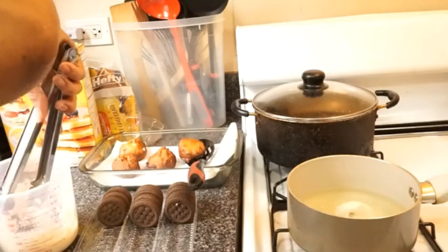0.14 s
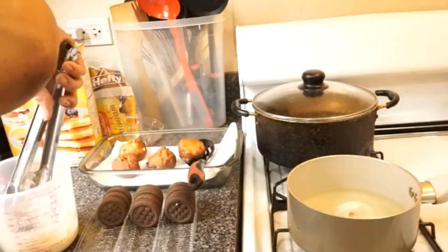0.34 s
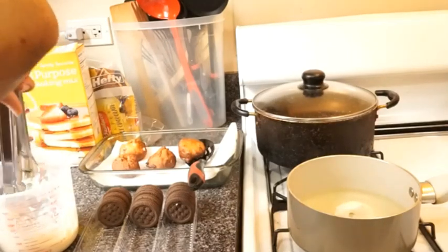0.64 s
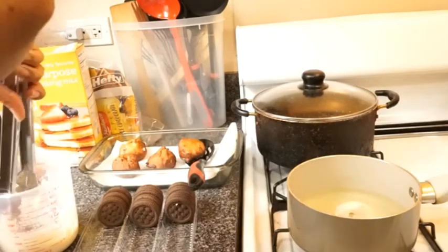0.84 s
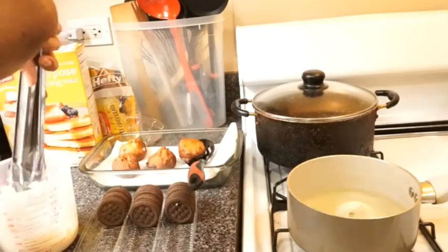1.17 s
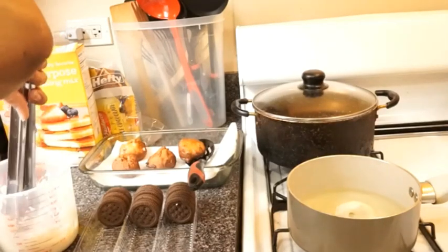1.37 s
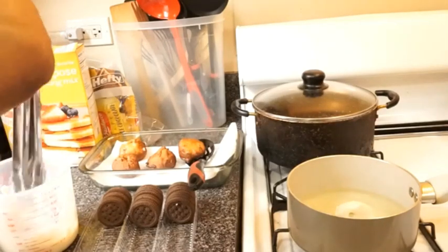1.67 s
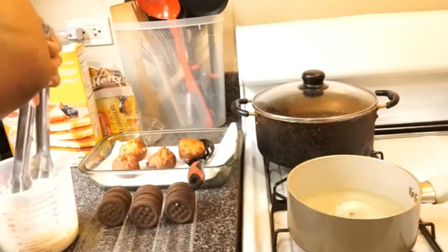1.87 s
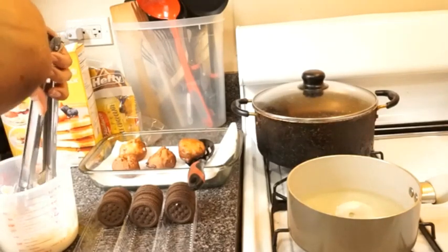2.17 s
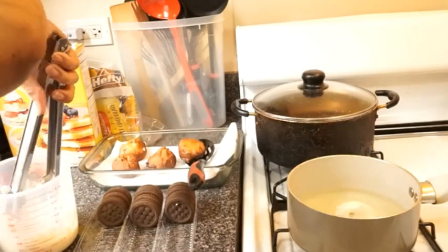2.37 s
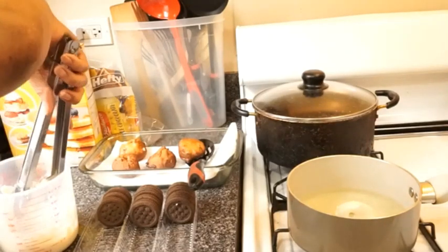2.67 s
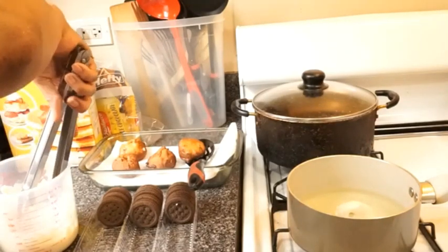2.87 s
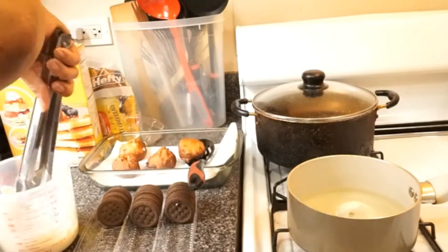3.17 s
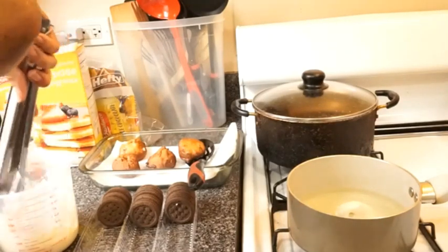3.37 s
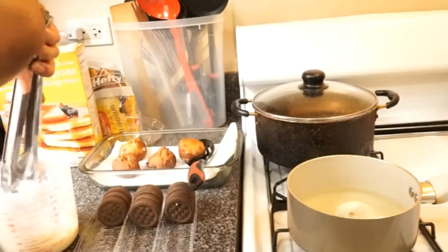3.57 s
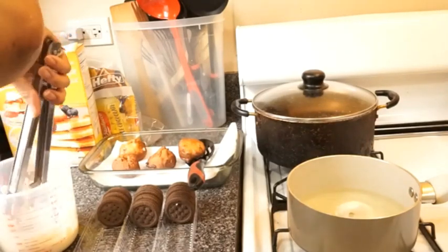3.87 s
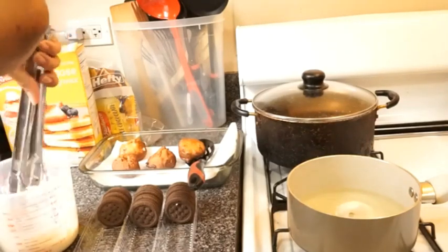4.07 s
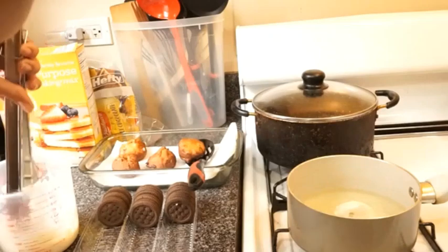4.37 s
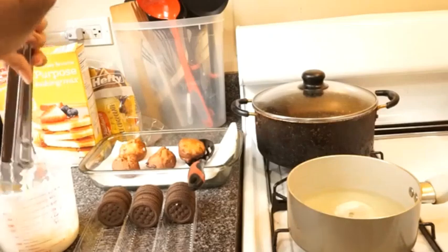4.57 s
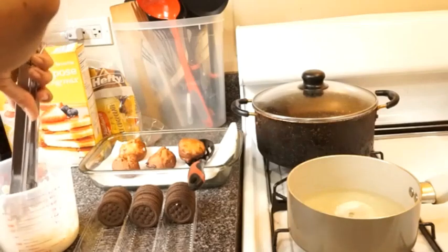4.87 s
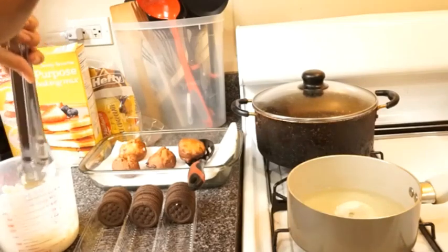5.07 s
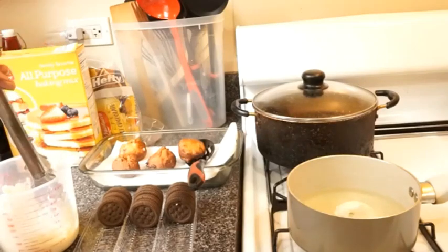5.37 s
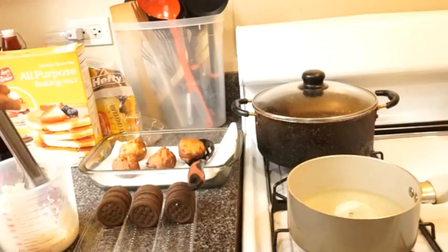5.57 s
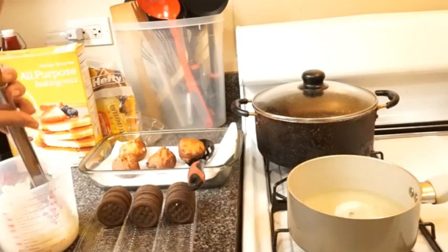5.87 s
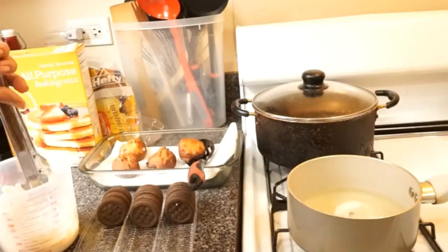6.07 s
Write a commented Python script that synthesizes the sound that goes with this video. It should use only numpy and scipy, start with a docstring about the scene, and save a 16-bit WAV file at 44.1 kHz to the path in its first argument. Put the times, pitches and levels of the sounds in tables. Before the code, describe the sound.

In a small kitchen, a pan of hot oil gives a faint, steady fizz. Close by, metal tongs tap unevenly against a plastic cup holding batter, mixing dull hollow bumps with sharp steel ticks and short rubs. A louder clatter comes near the middle and a sharp knock follows over a second later, before a few lighter taps and a soft scrape. The room adds a brief echo.

```python
"""Steel tongs knock and scrape in a plastic measuring cup, turning food in batter on a kitchen counter.
Each impact excites the damped modes of the cup's base, its air cavity, its wall and the steel arms;
sliding tips drive cavity, wall and steel by stick-slip friction. A pan of hot oil fizzes faintly over
a gas flame, and the small kitchen adds early reflections and a brief reverberation."""
import sys
import numpy as np
from scipy import signal
from scipy.fft import rfft, irfft
from scipy.io import wavfile
from scipy.ndimage import uniform_filter1d

SR = 44100
rng = np.random.default_rng(int(sys.argv[2]) if len(sys.argv) > 2 else 0)


def waveform_to_disk(signal):
    """Save audio, clipped to [-1, 1], as 16-bit WAV at the path in sys.argv[1]."""
    frames = np.transpose(np.atleast_2d(signal))
    scaled = np.clip(frames, -1, 1) * 32767
    samples = np.round(scaled).astype(np.int16)
    wavfile.write(sys.argv[1], SR, samples)


N = 274008
RING_S = .5   # time allowed for a sound to die away

# modes of the air in the cup: (f/Hz, level/dB, t60/s)
CAVITY_MODES = [(726, -5.5, 0.079), (720, 6.5, 0.071), (740, -4, 0.042)]
# modes of the plastic wall: (f/Hz, level/dB, t60/s)
WALL_MODES = [(613, -3.5, 0.037), (767, -11, 0.022), (1040, -0.5, 0.019), (1114, 2, 0.026),
              (1223, 2.5, 0.14), (1309, -1, 0.076), (1638, -9.5, 0.066), (1672, -1.5, 0.11),
              (1962, 7, 0.14), (2060, -2.5, 0.065), (2255, 5, 0.077), (2267, 7, 0.04), (2555, -1, 0.027),
              (2775, 7, 0.044), (3082, 5.5, 0.26), (3010, 8.5, 0.091), (3384, 6, 0.037), (3770, 1, 0.021)]
# modes of the steel arms: (f/Hz, level/dB, t60/s)
STEEL_MODES = [(2092, 7, 0.032), (2473, -4.5, 0.076), (2805, 5, 0.025), (3624, 7.5, 0.092), (3980, 2, .07),
               (4630, -23, 0.11), (4830, 8, 0.064), (5360, 4, 0.032), (5760, -13, 0.092),
               (5970, 4.5, 0.059), (6400, -15, 0.15), (6640, -6, 0.089), (7100, -10, 0.098),
               (7960, 2, 0.049), (10100, -15, 0.069), (10100, 12, 0.068)]
# coherence of the sound field in the room: (f/Hz, left-right correlation)
ROOM_COHERENCE = [(200, 0.93), (700, 0.91), (1400, 0.66), (3000, 0.4), (10000, 0.19)]


def from_db(db):
    """Amplitude ratio of a level in decibels."""
    return 10 ** (np.asarray(db) / 20)


def rms_one(x):
    """Normalisation to unit mean power."""
    return x / np.sqrt(np.mean(x ** 2) + 1e-20)


def at_hz(points, hz):
    """Interpolation of (f/Hz, value) points on a logarithmic frequency axis."""
    f, value = np.transpose(points)
    return np.interp(np.log(np.maximum(hz, 1)), np.log(f), value)


def add(out, start_s, sound):
    """Superposition of a sound from a given time on."""
    i = max(round(start_s * SR), 0)
    out[..., i:i + sound.shape[-1]] += sound[..., :N - i]


def panned(x, left_db):
    """Direction by level difference: left exceeds right by left_db."""
    return x * from_db([[left_db / 2], [-left_db / 2]])


def butter(x, hz, kind, order=2):
    """Causal Butterworth filter, maximally flat in its passband."""
    sections = signal.butter(order, np.clip(hz, 10, .45 * SR), kind, fs=SR, output="sos")
    return signal.sosfilt(sections, x)


def band(x, hz, width):
    """Band-pass whose edges have hz as their geometric mean."""
    low = np.hypot(hz, width / 2) - width / 2
    return butter(x, [low, low + width], "band")


def stereo_noise(n, coherence, gain=1):
    """Partially coherent noise: sum and difference of two independent spectra, weighted by gain."""
    alike = np.clip(at_hz(coherence, np.fft.rfftfreq(n, 1 / SR)), -1, 1)
    mid, side = rfft(rng.standard_normal((2, n))) * gain
    return irfft(np.sqrt((1 + alike) / 2) * mid + np.sqrt((1 - alike) / 2) * side * [[1], [-1]], n)


def stove(crossover_hz=310):
    """Source and filter: low flame noise and the hiss of oil, coloured by the pan's resonances."""
    # spectral density of flame and oil together: (f/Hz, level/dB)
    spectrum = [(40, -50), (90, -33), (130, -22.5), (210, -2.5), (400, -5), (650, -2), (1050, -0.5),
                (1450, -4.5), (2400, -3.5), (3300, -3), (4800, -1), (7500, -3.5), (9000, -5.5),
                (11000, -8.5)]
    # resonances of the pan under the bubbles: (f/Hz, bandwidth/Hz, level/dB)
    pan_modes = [(750, 16, 4.5), (916, 21, 9), (1008, 20, 4.5), (1060, 45, 2.5), (1204, 51, 7),
                 (1600, 29, 8.5), (1740, 49, 7.5), (1830, 30, 9.5), (1918, 69, 9.5), (2090, 56, 2.5),
                 (2640, 37, 6.5), (2733, 106, 6), (3550, 47, 10), (4080, 31, 4.5), (4406, 77, 7),
                 (4960, 33, 1), (5070, 36, 8.5), (5350, 26, 9), (7300, 120, 0.5), (7400, 260, 1.5),
                 (9900, 61, 7)]
    # coherence of the stove's sound: (f/Hz, left-right correlation)
    coherence = [(60, 0.58), (250, 0.79), (900, 0.36), (2000, 0.45), (4000, 0.14), (10000, 0.08)]
    # course of the two sources: (t/s, flame level/dB, oil level/dB)
    levels = [(0.1, -68, -54), (0.37, -78, -54.5), (2.78, -73, -51.5), (4.14, -77, -52), (4.79, -69, -51.5),
              (6.2, -69.5, -52)]
    hz, t = np.fft.rfftfreq(N, 1 / SR), np.arange(N) / SR
    resonance_db = sum(db / (1 + (2 * (hz - f) / width) ** 2) for f, width, db in pan_modes)
    colour = from_db(at_hz(spectrum, hz) + resonance_db)
    low_share = 1 / (1 + (hz / crossover_hz) ** 6)
    times, flame_db, oil_db = np.transpose(levels)
    flame = rms_one(stereo_noise(N, coherence, colour * np.sqrt(low_share)))
    oil = rms_one(stereo_noise(N, coherence, colour * np.sqrt(1 - low_share)))
    flame *= from_db(np.interp(t, times, flame_db))
    oil *= from_db(np.interp(t, times, oil_db))
    return panned(from_db(2) * (flame + oil), left_db=-1)


def fizz(pops_per_s=350, level_db=-64):
    """Shot noise: tiny bubbles burst on the oil at random, a few larger than the rest."""
    sizes = from_db(6 * np.minimum(rng.exponential(1, N), 2)) * rng.standard_normal((2, N))
    pops = sizes * (rng.random(N) < pops_per_s / SR)
    return from_db(level_db) * rms_one(band(pops + 1e-18, hz=5100, width=9200))


def ring(modes, vary_db):
    """Free vibration as a sum of damped modes; each touch lands elsewhere and weights them anew."""
    t = np.arange(int(RING_S * SR)) / SR
    hz, level_db, t60 = np.transpose(modes)[:, :, None]
    damping = np.log(1000) / t60
    resonance_peak = from_db(level_db + vary_db * rng.standard_normal(hz.shape))
    amplitude = resonance_peak * 2 * damping / SR
    sign = (-1) ** np.arange(len(modes))[:, None]
    return np.sum(sign * amplitude * np.exp(-damping * t) * np.sin(2 * np.pi * hz * t), axis=0)


def crack(t60, snap):
    """Contact transient of about unit energy: an impulse, then dense modes overlapping as noise."""
    t = np.arange(int(RING_S * SR)) / SR
    burst = stereo_noise(len(t), ROOM_COHERENCE) * np.exp(-np.log(1000) * t / t60)
    burst = rms_one(burst) / np.sqrt(len(t))
    burst[:, 0] += snap
    return burst / np.hypot(1, snap)


def knocks():
    """Impact excitation: a blow rocks the base, pumps the cavity and rings the wall and the steel."""
    # blows of the tongs; the contact frequency is high for bare steel, low for steel in batter:
    # (t/s, base level/dB, cavity level/dB, wall level/dB, steel level/dB, contact f/Hz)
    blows = [ (0.002, -6, -11, -20, -32, 2800), (0.2235, -17, -1, -14, -1, 2880),
             (0.2325, -15, -11, -12, 1, 3020), (0.7128, -3, -9.5, -9, -34, 2970),
             (1.1096, -17, -34, -16, -3.5, 2670), (1.1852, -34, -36, -20, -5, 6700),
             (1.2215, -21, 0, -13.5, -14, 3050), (1.2535, -4.5, 3, -14, -14, 3000),
             (1.302, -13, -7.5, -30, -35, 3000), (1.7330, -2.5, 5.5, 1.5, -2.5, 3950),
             (2.044, -9, -6.5, -19, -16, 4550), (2.7362, -11, 10.5, -10.5, -15, 3620),
             (2.8670, -11, 5.5, -10, -4, 2700), (2.8882, -1, 16, -0.5, 7.5, 2440),
             (2.9, -0.5, 5, -1.5, 3.5, 5370), (3.3560, -1, -7, -5.5, -27, 2660),
             (3.672, -27, -34, -36, -7, 10000), (3.8037, -14, -3.5, -7, -7.5, 2930),
             (3.8280, -5, -11, -13, -23, 2800), (4.2960, 3, 4, 13.5, 2, 5900),
             (4.3030, -1, 2.5, 0, 10, 2450), (4.3777, -18, -22, -8.5, 6, 7260),
             (4.6903, -4.5, -7.5, -3, -1, 6000), (4.8436, -15, -10, -9.5, 0.5, 6500),
             (5.0700, -14, -23, -15.5, -15, 3140), (5.1860, -13.5, -6.5, -8.5, -11, 3580),
             (5.6675, -2.5, 6, -1, -7.5, 2640), (5.8695, -17, -12, -11.5, 3.5, 2750)]
    # modes of the cup's base and the counter under it: (f/Hz, level/dB, t60/s)
    base_modes = [(88, -2.5, 0.11), (255.3, 0.5, 0.22), (350, -3, 0.16), (424.5, 2.5, 0.11)]
    # direction of the steel tick: (contact f/Hz, left minus right level/dB)
    tick_balance = [(2800, 0.5), (7000, -1.5)]
    out = np.zeros((2, N))
    for start_s, base_db, cavity_db, wall_db, steel_db, contact_hz in blows:
        thud_hz = 369 * 2 ** (.02 * base_db)   # a firmer push seats the base harder and raises its thud
        rock = ring(base_modes, vary_db=2.5) + from_db(-5.5) * crack(t60=0.047, snap=0.76)
        base = from_db(base_db + 0.5) * band(rock, thud_hz, width=290)
        # batter shifts under the tips and blurs the cavity's note
        gulp = band(crack(t60=0.051, snap=0.84), hz=767, width=290)
        cavity = from_db(1) * ring(CAVITY_MODES, vary_db=1) + from_db(-5.5) * gulp
        cavity = from_db(cavity_db) * butter(cavity, 240, "high")
        wall = from_db(-1) * ring(WALL_MODES, vary_db=3.5)
        wall = wall + from_db(-2) * butter(crack(t60=0.07, snap=0.41), 790, "high")
        wall = from_db(wall_db) * butter(wall, 0.59 * contact_hz, "low")   # batter cushions the contact
        steel = from_db(-1.5) * ring(STEEL_MODES, vary_db=1.5)
        steel = steel + from_db(-0.5) * crack(t60=0.063, snap=0.22)
        tick_width = 770 * (contact_hz / 2970) ** 1.39   # a high tick is short and wide, a low one rings
        # a harder blow is briefer and so brighter
        treble = from_db(-15.5 + 0.47 * steel_db) * butter(steel, 3400, "high")
        tick = from_db(steel_db) * (band(steel, contact_hz, tick_width) + treble)
        add(out, start_s, panned(base + cavity + wall, left_db=2))
        add(out, start_s, panned(tick, at_hz(tick_balance, contact_hz)))
    return out


def scrapes(slips_per_s=2500):
    """Stick-slip friction: dense, uneven slips of the tips drive wall, cavity and steel together."""
    # strokes along the wall: (peak t/s, rise time/s, level/dB, centre f/Hz)
    strokes = [ (0.165, 0.013, -56, 1470), (0.233, 0.0053, -41, 7800), (0.908, 0.013, -57, 4060),
               (1.425, .017, -58, 8420), (2.320, .055, -59, 1170), (2.875, 0.017, -41.5, 5140),
               (2.911, .017, -33, 4500), (3.185, .025, -46, 3300), (4.292, 0.016, -39.5, 6850),
               (4.828, 0.02, -51, 6160), (5.750, 0.029, -59, 2830), (5.870, .010, -42.5, 4200),
               (6.010, .04, -54.5, 3960)]
    out, t = np.zeros((2, N)), np.arange(int(RING_S * SR)) / SR
    for peak_s, rise_s, level_db, hz in strokes:
        lead_s, fall_s, width = 2.5 * rise_s, 1.42 * rise_s, 1.23 * hz
        envelope = np.exp(-((t - lead_s) / np.where(t < lead_s, rise_s, fall_s)) ** 2 / 2)
        slips = (rng.random(len(t)) < slips_per_s / SR) * rng.standard_normal(len(t))
        force = from_db(level_db + 1.5) * rms_one(slips) * envelope
        rub = crack(t60=0.019, snap=0.51) + from_db(-3) * ring(STEEL_MODES, vary_db=3.5)
        rub += from_db(-5.5) * ring(WALL_MODES, vary_db=4)
        cup = band(from_db(5) * ring(CAVITY_MODES, vary_db=1) + from_db(2) * rub, hz=870, width=690)
        response = band(rub, hz, width) + cup * width / 6500   # a firm, broadband rub shakes the cup too
        response /= np.sqrt(np.sum(response ** 2) / 2)
        add(out, peak_s - lead_s, signal.fftconvolve(force[None], response, axes=1))
    return panned(out, left_db=1.5)


def smooth_colour(x, fine_hz=50, broad_hz=500):
    """Well-scattered sound has no strong narrow peaks: each band is levelled with its neighbours."""
    spectrum, bin_hz = rfft(x), SR / x.shape[-1]
    power = np.mean(np.abs(spectrum) ** 2, axis=0) + 1e-20
    fine, broad = (uniform_filter1d(power, int(width / bin_hz)) for width in (fine_hz, broad_hz))
    return irfft(spectrum * np.sqrt(np.abs(broad / fine)), x.shape[-1])


def kitchen(x, build_s=0.0024, tail_s=.35, right_lag_s=.000035):
    """Room response: direct sound, early reflections and a diffuse field that decays band by band."""
    # reverberation: (f/Hz, t60/s, level/dB)
    decay_bands = [(80, 0.35, -3), (250, 0.28, 5.5), (690, 0.22, 0), (1500, 0.33, -2), (3980, 0.27, -2),
                   (9900, 0.38, -6.5)]
    # reflections from counter, boxes and back wall: (left delay/s, right delay/s, level/dB)
    reflections = [(.0025, 0.0022, -15.5), (.0074, 0.0089, -9), (.0091, .0082, -10)]
    t = np.arange(int(RING_S * SR)) / SR
    hz = np.fft.rfftfreq(len(t), 1 / SR)
    noise, tail = rfft(stereo_noise(len(t), ROOM_COHERENCE)), 0
    centres = [row[0] for row in decay_bands]
    build_up = 1 - np.exp(-(t / build_s) ** 2)
    for own_band, (_, t60, tail_db) in zip(np.eye(len(centres)), decay_bands):
        share = at_hz(list(zip(centres, own_band)), hz)
        fade = rms_one(np.exp(-np.log(1000) * t / t60) * build_up) / np.sqrt(len(t))
        tail = tail + from_db(tail_db) * fade * irfft(noise * share, len(t))
    tail = smooth_colour(tail)[:, t < tail_s]
    wet = signal.fftconvolve(x, tail, axes=1)[:, :N]
    bright = butter(x, 1900, "high", order=1)   # small surfaces return only short waves
    for left_s, right_s, echo_db in reflections:
        add(wet[0], left_s, from_db(echo_db) * bright[0])
        add(wet[1], right_s, from_db(echo_db) * bright[1])
    add(wet[0], 0, x[0])
    add(wet[1], right_lag_s, x[1])   # the cup stands to the left
    return wet


def scene():
    """Superposition of the sources: tongs and cup close by, the stove behind."""
    return kitchen(from_db(0.5) * knocks() + scrapes() + fizz()) + stove()


def record(dry, bass_hz=60, cutoff_hz=11150):
    """Band limiting: the microphone drops the deep bass and an elliptic low-pass cuts the top."""
    low_pass = signal.ellip(12, .1, 70, cutoff_hz, fs=SR, output="sos")
    return signal.sosfilt(low_pass, butter(dry, bass_hz, "high"))


dry = scene()
out = record(dry)
waveform_to_disk(out)
```